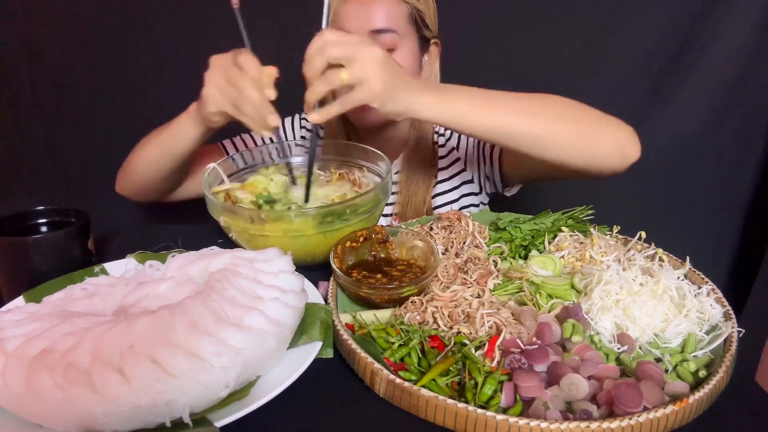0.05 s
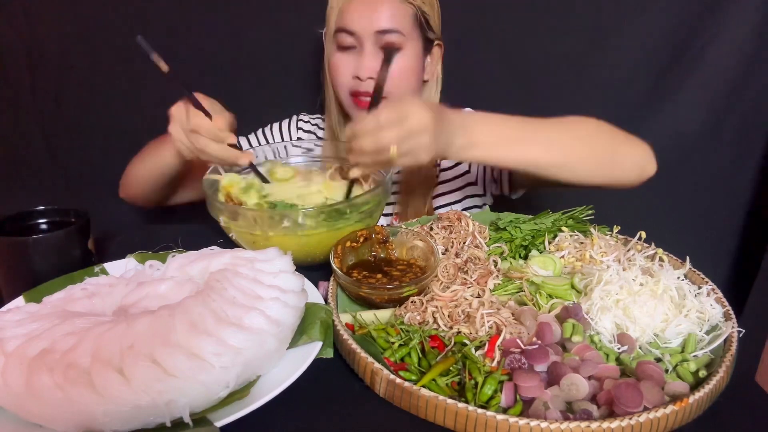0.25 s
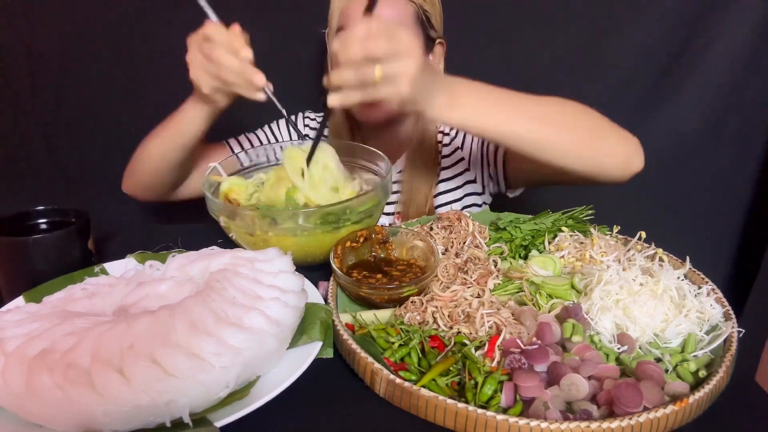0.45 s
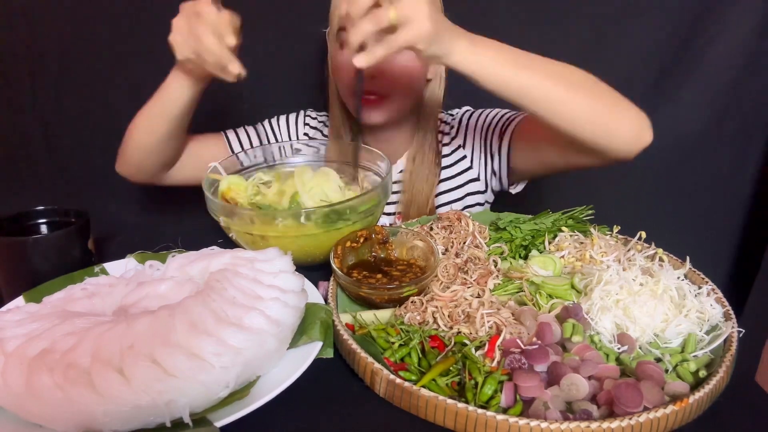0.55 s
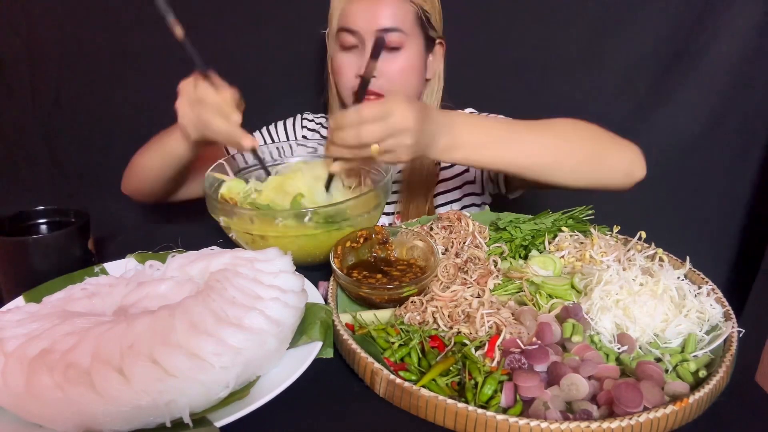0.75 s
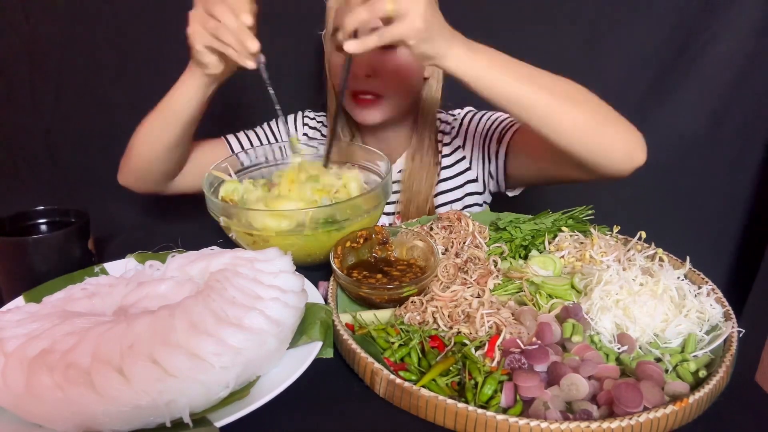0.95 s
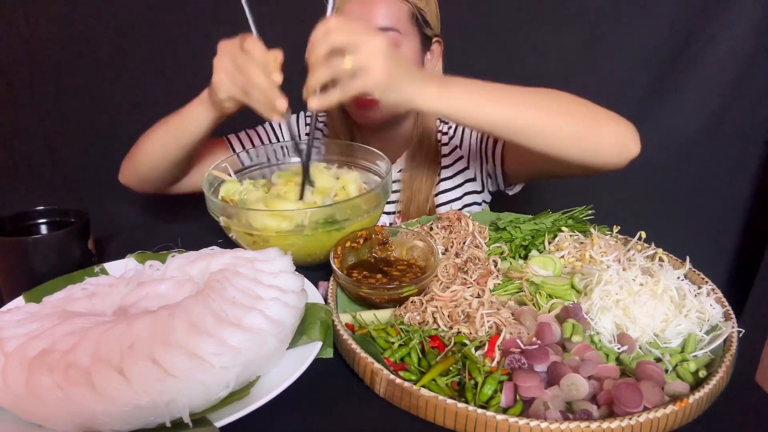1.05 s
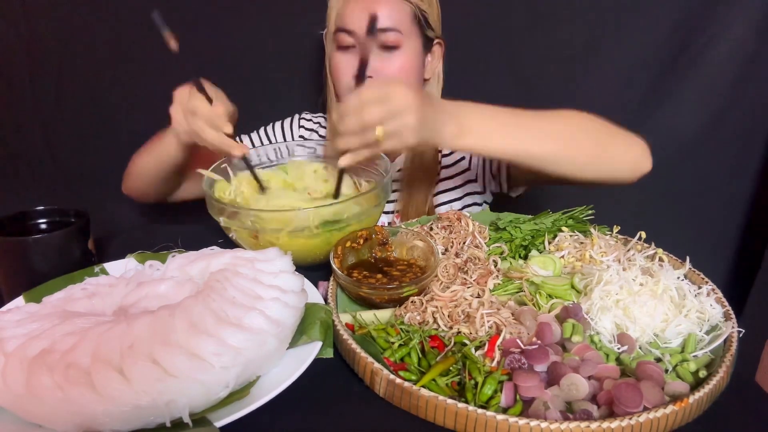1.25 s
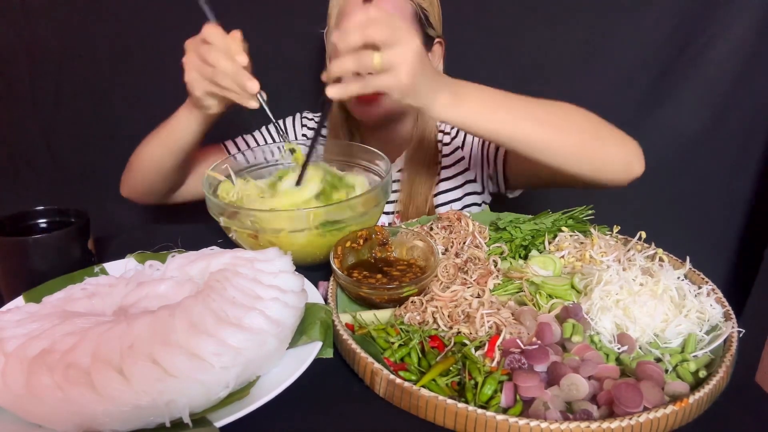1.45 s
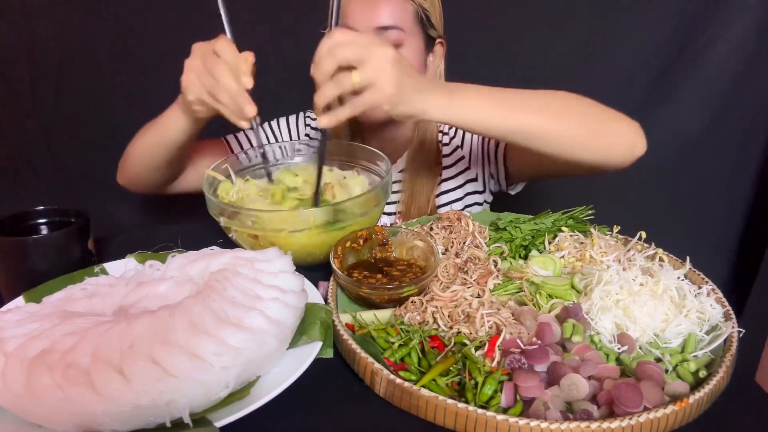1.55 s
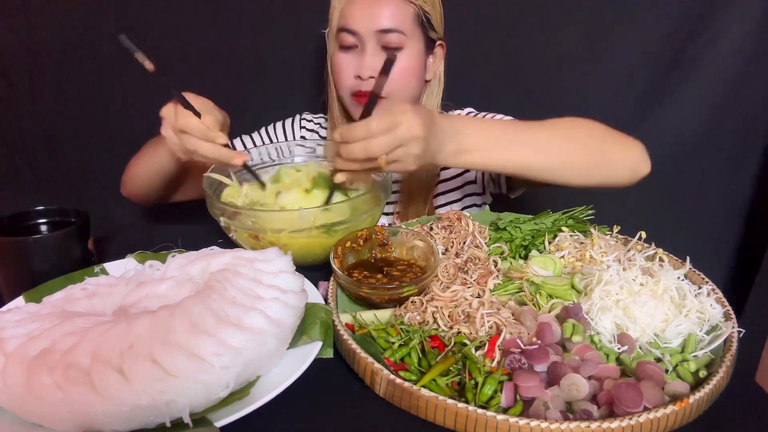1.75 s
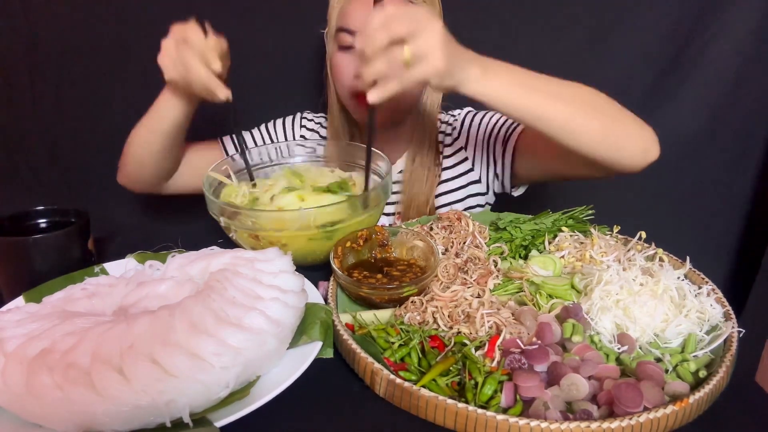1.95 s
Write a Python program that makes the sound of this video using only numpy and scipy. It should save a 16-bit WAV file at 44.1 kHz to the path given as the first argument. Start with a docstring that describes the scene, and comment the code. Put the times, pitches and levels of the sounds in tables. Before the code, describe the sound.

Utensils knock twice on a glass bowl, with wet noodles squelching softly in between.

```python
"""Utensils knock a glass bowl of noodles, greens and broth on a table, in a small dry room.
Twice they dive in to toss the food: one taps, then the other knocks the bowl, whose ring the food damps,
and the table thuds. Between the dives the rim clinks lightly. The wet noodles squelch as they slide
and lift, with films snapping and air pockets popping, over a faint rumble and hiss."""
import sys
import numpy as np
from scipy import signal
from scipy.fft import rfft, irfft
from scipy.io import wavfile
from scipy.ndimage import uniform_filter1d, minimum_filter1d

SR = 44100
rng = np.random.default_rng(int(sys.argv[2]) if len(sys.argv) > 2 else 0)


def master_out(mix):
    """Clip the mix to full scale and print it as 16-bit PCM to the path in sys.argv[1]."""
    frames = np.transpose(np.atleast_2d(mix))
    ceiling = np.clip(frames, -1, 1)
    pcm = np.round(ceiling * 32767).astype(np.int16)
    wavfile.write(sys.argv[1], SR, pcm)


N = 88200
TIME_S = np.arange(N) / SR
BIN_HZ = np.maximum(np.arange(N // 2 + 1) * SR / N, 1)


def undb(db):
    """Decibels to gain."""
    return 10 ** (np.asarray(db) / 20)


def pan(db):
    """Left and right gains, with the left louder by db."""
    return undb(np.array([[db], [-db]]) / 2)


def since(start):
    """Seconds since a moment, zero before it."""
    return np.maximum(TIME_S - start, 0)


def decay(start, t60):
    """A sudden onset that falls 60 dB in t60 seconds."""
    t = since(start)
    return (t > 0) * np.exp(-np.log(1000) * t / t60)


def stereo(pair, gain, wide_hz=6540):
    """Colour two unrelated signals as mid and side, widening up to wide_hz; rms 1."""
    mid, side = rfft(pair) * gain
    side = side * np.clip((BIN_HZ / wide_hz) ** 0.51, .15, 1)
    channels = irfft(np.array([mid + side, mid - side]), N)
    return channels / channels.std()


def noise(eq):
    """Stereo noise shaped by (freq_hz, gain_db) points; rms 1."""
    hz, db = np.array(eq).T
    gain = undb(np.interp(np.log(BIN_HZ), np.log(hz), db))
    return stereo(rng.standard_normal((2, N)), gain)


def mode(start, hz, t60):
    """One fading resonance that builds within a cycle, a little out of phase between left and right."""
    phase = 2 * np.pi * hz * since(start)
    offset_rad = np.array([[-1], [1]]) * np.clip(0.24 * np.sqrt(hz / 1000), 0, 1)
    return np.sin(phase + offset_rad) * (1 - np.exp(-phase)) * decay(start, t60)


# EQ of the room tone: freq_hz, gain_db
ROOM_TONE_EQ = [(20, -27), (45, -9.5), (90, 2), (150, -6.5), (300, -7), (1000, -13), (3000, -23),
                (5500, -12.5), (9000, -23), (16000, -28)]
def room_tone():
    """A steady bed of faint rumble and hiss."""
    return undb(-63) * noise(ROOM_TONE_EQ)


# Reverb bands of the small room: centre_hz, level_db, t60_s
REVERB_BANDS = [(150.7, -3.5, .16), (600, -4.5, 0.11), (1320, -5.5, 0.22), (3400, -5.5, .21),
                (6000, -8.5, 0.23), (14970, -11.5, 0.35)]
def room(dry, predelay_s=.0065):
    """The direct sound plus dense short reflections, weaker in the treble."""
    centres = np.log([row[0] for row in REVERB_BANDS])
    spectrum = rfft(stereo(rng.standard_normal((2, N)), 1, wide_hz=1800))
    response = 0
    for k, (_, db, t60) in enumerate(REVERB_BANDS):
        band = np.interp(np.log(BIN_HZ), centres, np.eye(len(centres))[k])
        fade = decay(predelay_s, t60)
        response += undb(db) * irfft(spectrum * band, N) * fade / np.linalg.norm(fade)
    return dry + signal.fftconvolve(dry, response, axes=1)[:, :N]


# Fader ride of the shifting bowl: time_s, level_db
SHIFT_FADER = [(0, -80), (1.22, -83.5), (1.36, -65.5), (1.55, -75.5), (1.7, -64), (1.9, -65.5), (2, -70)]
# EQ of its rumble: freq_hz, gain_db
SHIFT_EQ = [(30, -23), (70, -1), (105, 0.5), (180, -10.5), (400, -16), (800, -25), (2000, -44)]
def bowl_shift():
    """A faint low rumble as the bowl moves on the table while the noodles are lifted."""
    times, levels_db = np.array(SHIFT_FADER).T
    return undb(np.interp(TIME_S, times, levels_db)) * noise(SHIFT_EQ)


def air_pocket(t, hz, t60):
    """An air pocket swells over one cycle and rings out."""
    attack = 1 - np.exp(-(hz * t) ** 2)
    return np.sin(2 * np.pi * hz * t) * attack * np.exp(-np.log(1000) * t / t60)


def bubbles(per_s=130, low_hz=3400, high_hz=12950, ring_cycles=36):
    """Tiny air pockets burst at random, each a brief high ping."""
    t = np.arange(600) / SR
    out = np.zeros((2, N + len(t)))
    candidates = rng.random(size=(800, 5))
    for when, pitch, size, place, luck in candidates:
        if luck < per_s * N / SR / len(candidates):
            hz = low_hz * (high_hz / low_hz) ** pitch
            level_db = 3 * min(-np.log(size), 2.5)
            ping = air_pocket(t, hz, ring_cycles / hz)
            onset = int(when * N)
            out[:, onset:onset + len(t)] += undb(level_db) * pan(8 * (place - .5)) * ping
    return out[:, :N]


# Noodle squelch cues: peak_s, rise_s, fall_s, level_db, low_cut_hz, tilt_db_per_octave
SQUELCH_CUES = [(0.031, 0.017, 0.073, -52.5, 4540, -3.5), (.13, 0.023, 0.027, -43, 3540, -5),
                (0.208, 0.017, 0.015, -48, 3000, -6), (0.426, 0.043, 0.033, -46, 2000, -3),
                (.49, 0.022, 0.025, -47.5, 1930, -6), (.645, 0.027, 0.089, -48.5, 1600, -2.5),
                (0.717, 0.014, 0.013, -51, 1670, -15), (0.813, 0.021, 0.12, -51.5, 2276, -4),
                (0.931, 0.021, 0.024, -43, 1820, -0.5), (1.10, 0.033, 0.11, -58.5, 3455, -6.5),
                (1.45, .02, 0.054, -51, 3500, 0), (1.495, 0.011, 0.031, -42, 2200, 1),
                (1.565, 0.029, 0.041, -49.5, 4330, -3.5), (1.621, 0.017, 0.021, -37, 860, 1),
                (1.699, 0.037, 0.041, -52.5, 1400, -5.5), (1.784, .015, 0.059, -56, 1570, -2.5),
                (1.904, 0.025, .025, -49.5, 1970, -6.5)]
def squelches(grains_per_s=3100):
    """Swells of wet crackles and bubbles as the noodles slide over each other."""
    crackle, motion = 0, 0
    for peak, rise, fall, db, low_cut_hz, tilt_db in SQUELCH_CUES:
        triggers = rng.random(N) < grains_per_s / SR
        accent_db = 3 * np.minimum(rng.exponential(size=N), 3.5)
        grains = triggers * undb(accent_db) * rng.standard_normal((2, N))
        tilt = undb(tilt_db * np.log2(np.maximum(BIN_HZ / low_cut_hz, 1)))
        low_cut = 1 / np.sqrt(1 + (low_cut_hz / BIN_HZ) ** 6)
        attack = np.exp(-((TIME_S - peak) / rise) ** 2)
        release = np.exp(-(since(peak) / fall) ** 1.3)
        swell = undb(db) * np.where(TIME_S < peak, attack, release)
        crackle += swell * stereo(grains, tilt * low_cut)
        motion += swell
    return crackle + undb(3) * motion * bubbles()


# Wet pop cues: start_s, level_db, pitch_hz, snap_share (0 all ring, 1 all snap)
POP_CUES = [(.007, -36, 8600, 0.39), (0.018, -34.5, 11060, 0.2), (.112, -37, 4370, 0.36),
            (.200, -25, 4400, 0.58), (.411, -29.5, 2300, 0), (.430, -25, 7780, 0.61),
            (0.442, -33.5, 2850, 0), (0.484, -27.5, 2600, .25), (.6855, -33.5, 4080, 0),
            (.7115, -36, 2180, 0), (.812, -34.5, 3000, .4), (.918, -34.5, 5750, 0.6),
            (1.093, -39.5, 5090, 0.24), (1.441, -32.5, 9300, 0.8), (1.483, -35.5, 2180, 0.14),
            (1.490, -25.5, 4430, 0.98), (1.535, -36.5, 6500, 0.2), (1.563, -31, 5710, .3),
            (1.603, -30.5, 8000, 0.76), (1.611, -31, 4020, 0.6), (1.618, -22.5, 10120, 0.53),
            (1.631, -31.5, 990, 0), (1.748, -38.5, 5500, 0.43), (1.8883, -31, 2150, 0.1),
            (1.908, -31.5, 3380, 0.42)]
def pops():
    """Wet films snap and small air pockets ring."""
    bright_noise = noise([(400, -21.5), (1000, -6.5), (1800, -2.5), (6000, 10.5), (16000, 4)])
    out = 0
    for start, db, hz, snap_share in POP_CUES:
        ring = air_pocket(since(start), hz, t60=.013)
        snap = bright_noise * decay(start, t60=.008)
        out += undb(db) * ((1 - snap_share) * ring + snap_share * snap)
    return out


# Modes of the glass rim: pitch_hz, level_db, t60_s, pan_db
RIM_MODES = [(727, -26.5, 0.054, 0), (1263, -17.5, 0.038, 2.3), (2300, -13.5, 0.028, -0.76),
             (3660, -10.5, 0.026, -2.2), (5770, 1, 0.015, -2.2), (6400, -6, 0.028, -2),
             (7790, -5, 0.055, -1.4), (8210, -2.5, 0.036, -2.2), (14150, -3, 0.024, -1)]
def rim_clink(start=.598):
    """A glancing touch ticks and rings the high modes of the rim."""
    ring = 0
    for k, (hz, db, t60, pan_db) in enumerate(RIM_MODES):
        ring += (-1) ** k * undb(db) * pan(pan_db) * mode(start, hz, t60)  # polarity alternates
    tick_eq = [(500, -19), (4000, -5), (7000, -3), (11000, 2), (15000, -2)]
    tick = noise(tick_eq) * decay(start, t60=.024)
    return undb(-27) * (ring + undb(-6.5) * tick)


# Modes of the table under the bowl: pitch_hz, level_db, t60_s
TABLE_MODES = [(78, -16, .35), (121.7, -2.5, .24), (157.5, -6, .17), (198.7, 2, .2), (270, -7.5, .15),
               (330, -3.5, .18), (474.5, 6, .16), (532.4, 4, .14)]
# EQ of the laden table's dull clatter: freq_hz, gain_db
CLATTER_EQ = [(30, -22.5), (70, -16), (120, -2), (250, -7), (380, 0), (480, 3.5), (700, -1.5), (1000, -7),
              (1300, 3), (1700, -20), (4000, -35)]
def table_thud(start, rise_s=.0035, clatter_hold_s=.012, clatter_t60_s=.15):
    """The table top swings up and booms briefly, and what stands on it clatters."""
    swing = 1 - np.exp(-since(start) / rise_s)
    boom = sum((-1) ** k * undb(db) * mode(start, hz, t60) for k, (hz, db, t60) in enumerate(TABLE_MODES))
    fade = np.exp(-np.log(1000) * since(start + clatter_hold_s) / clatter_t60_s)
    clatter = undb(4) * noise(CLATTER_EQ) * fade
    return swing * (boom + clatter)


# Utensil tap cues: start_s, click_db, ring_db, pitch_hz, skid_db (relative to the click)
TAP_CUES = [(0.2338, -24, -6.5, 2174, -11), (1.2531, -20.5, -19, 3125, -10)]
# EQ of the click and skid: freq_hz, gain_db
TAP_EQ = [(500, -13), (1100, -11.5), (1600, -4), (3000, 0.5), (5500, -0.5), (7500, -17.5), (10000, -11),
          (13000, -18.5), (16000, -10)]
# Modes of the utensil: pitch_ratio, level_db, t60_s
UTENSIL_MODES = [(.71, -14.5, .018), (1, -2.5, 0.018), (1.1, -10, .012), (1.38, -16.5, 0.018)]
def utensil_taps():
    """The first utensil lands with a dry click, a short ring and a faint table thud, then skids."""
    low_cut = signal.butter(3, 810, "high", fs=SR, output="sos")
    out = 0
    for start, click_db, ring_db, hz, skid_db in TAP_CUES:
        contact = decay(start, t60=.014) + undb(skid_db) * decay(start, t60=.15)
        click_and_skid = undb(click_db) * noise(TAP_EQ) * contact
        ring = sum(undb(db) * mode(start, hz * ratio, t60) for ratio, db, t60 in UTENSIL_MODES)
        tap = signal.sosfilt(low_cut, click_and_skid + undb(ring_db) * ring)
        out += pan(-2) * tap + undb(-49) * table_thud(start)
    return out


# Bowl knock cues: start_s, glass_db, tilt_db_per_octave, thud_db
KNOCK_CUES = [(0.274, 1, -0.5, -25.5), (1.2891, 0, -.7, -28)]
# EQ of the contact crack: freq_hz, gain_db
CRACK_EQ = [(100, -20), (450, 0), (800, -3.5), (1700, -8), (3000, -1.5), (5500, -2), (9000, -5),
            (12000, -11), (16000, -2.5)]
# Modes of the filled glass bowl: pitch_hz, level_db, t60_s, pan_db
BOWL_MODES = [(955, -13.5, 0.027, -3), (1193, -12.5, 0.074, 4), (1290, -2, 0.038, 2.5), (1391, -2, .024, 0),
              (2088, -12, .025, -3), (2490, -13.5, .02, -0.5), (2760, -16, 0.018, -0.5),
              (3197, -13, .045, 2.5), (3336, -13.5, 0.062, -7), (3529, -11, .025, -3.5),
              (4392, -12.5, 0.031, -8), (4603, -11.5, 0.034, 0.5), (5731, -10.5, .028, 0),
              (7145, -15.5, 0.02, -1.5), (8880, -17, .028, -3)]
def bowl_knocks():
    """The second utensil hits the bowl: a sharp crack, a ring choked by the food, a table thud."""
    pivot_hz = BOWL_MODES[1][0]
    out = 0
    for start, glass_db, tilt_db, thud_db in KNOCK_CUES:
        crack = undb(-12) * noise(CRACK_EQ) * decay(start, t60=.016)
        ring = 0
        for k, (hz, db, t60, pan_db) in enumerate(BOWL_MODES):
            gain = undb(db + tilt_db * np.log2(hz / pivot_hz))
            ring += (-1) ** k * gain * pan(pan_db) * mode(start, hz, t60)
        out += undb(glass_db) * (crack + ring) + undb(thud_db) * table_thud(start)
    return out


def scene():
    """Utensils, bowl and food in the room, over a faint rumble and hiss."""
    food = pan(-1.5) * (pops() + squelches())
    hits = bowl_knocks() + utensil_taps() + rim_clink()
    return room(hits + food) + bowl_shift() + room_tone()


def limiter(x, threshold_db=-1, release_db_per_s=16, lookahead_s=.004):
    """The gain ducks just before a loud peak and creeps back."""
    peak_db = 20 * np.log10(np.abs(x).max(axis=0) + 1e-9)
    over_db = np.maximum(peak_db - threshold_db, 0)
    span = int(2 * lookahead_s * SR)
    held_db = -minimum_filter1d(-over_db, span)
    recovery_db = release_db_per_s * TIME_S
    cut_db = np.maximum.accumulate(held_db + recovery_db) - recovery_db
    return x * undb(-uniform_filter1d(cut_db, span))


def record(dry):
    """Master chain: a limiter on the knocks, then a steep high cut at 16 kHz."""
    high_cut = signal.ellip(8, .2, 70, 16000, fs=SR, output="sos")
    return signal.sosfilt(high_cut, limiter(dry))


dry = scene()
out = record(dry)
master_out(out)
```